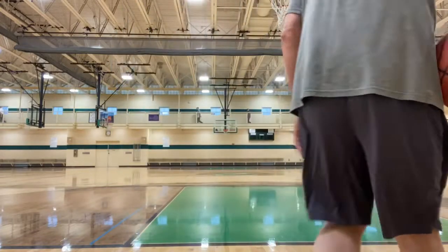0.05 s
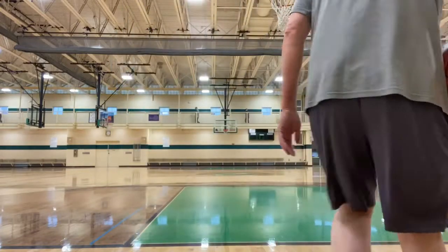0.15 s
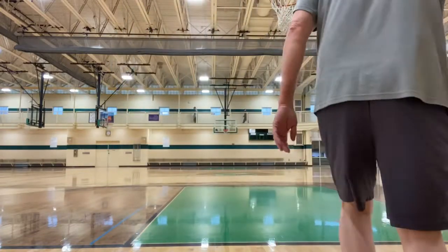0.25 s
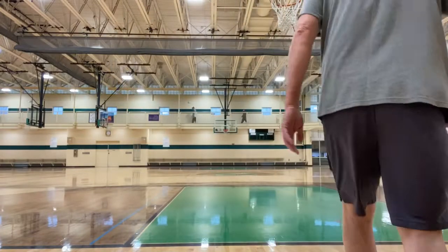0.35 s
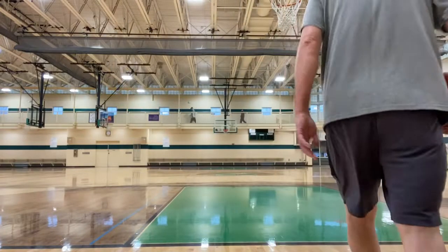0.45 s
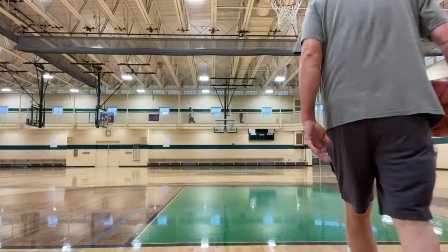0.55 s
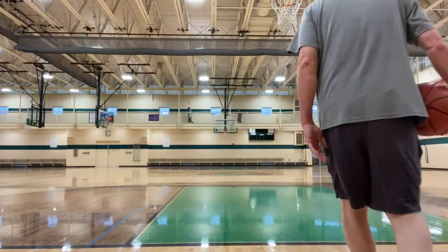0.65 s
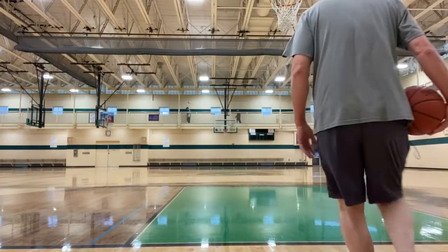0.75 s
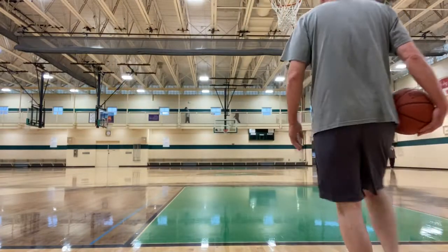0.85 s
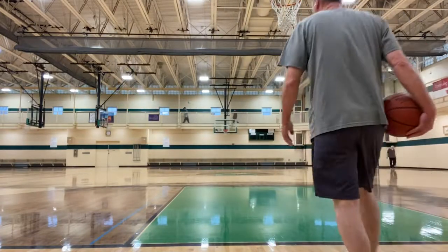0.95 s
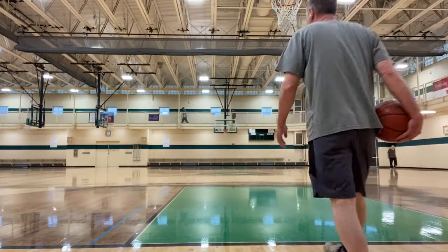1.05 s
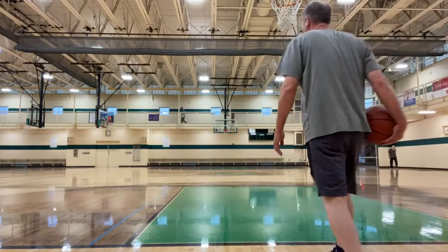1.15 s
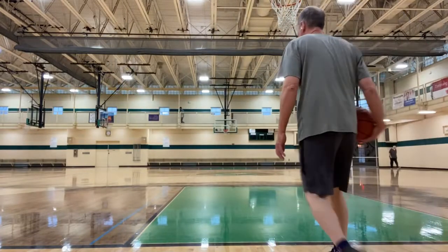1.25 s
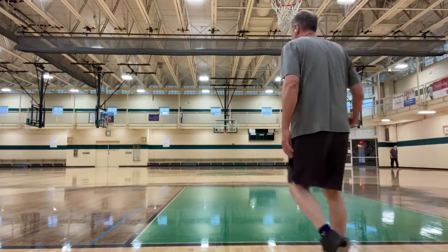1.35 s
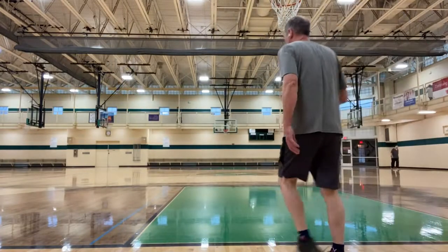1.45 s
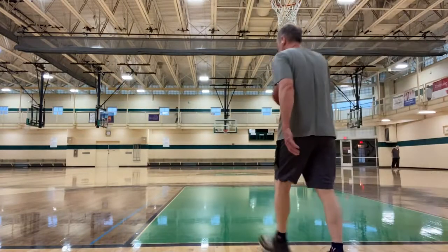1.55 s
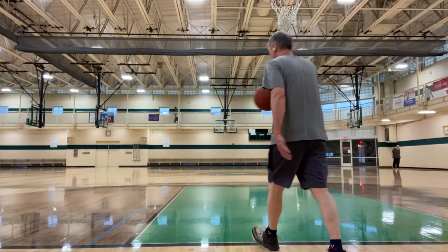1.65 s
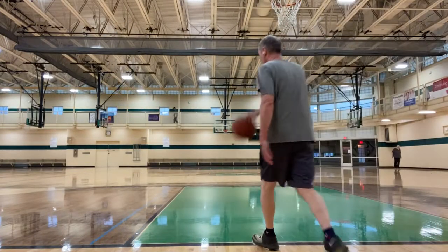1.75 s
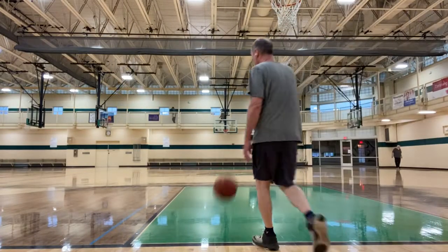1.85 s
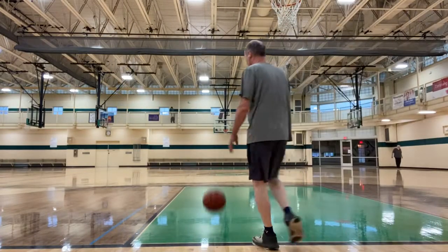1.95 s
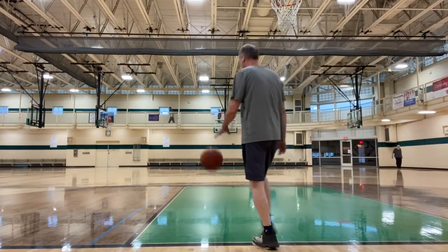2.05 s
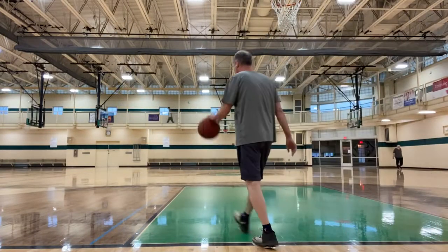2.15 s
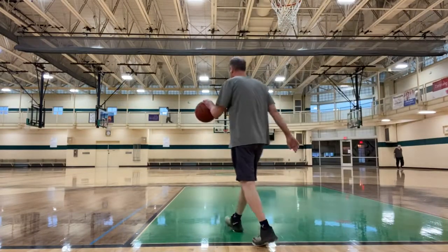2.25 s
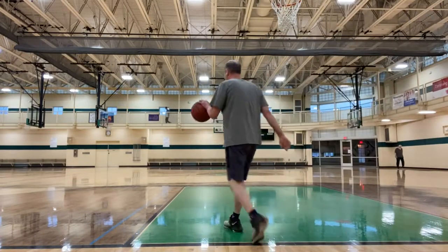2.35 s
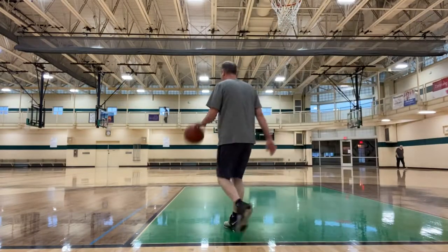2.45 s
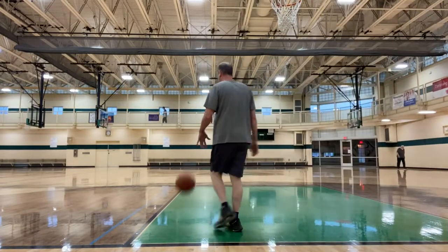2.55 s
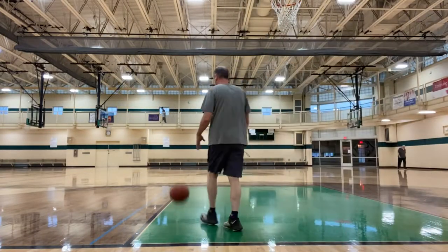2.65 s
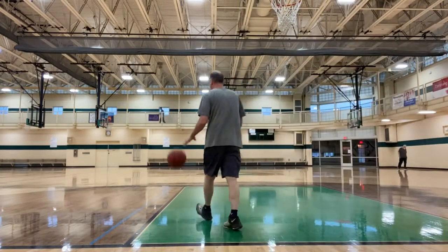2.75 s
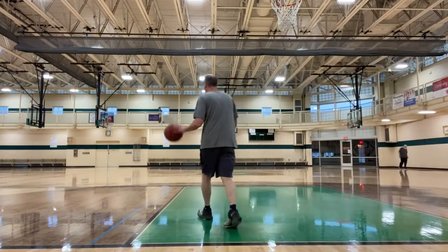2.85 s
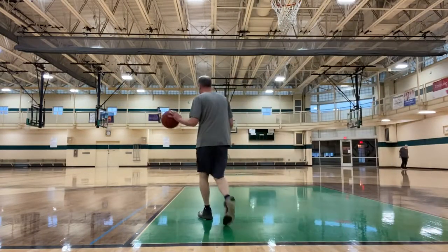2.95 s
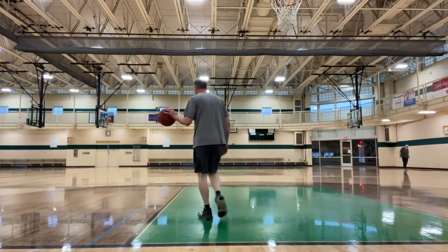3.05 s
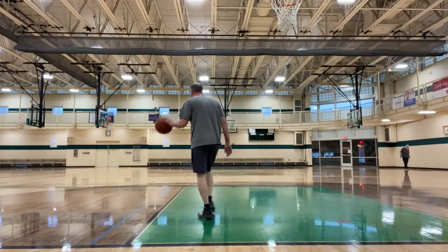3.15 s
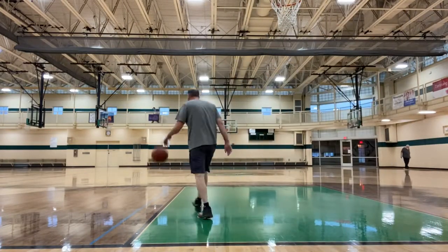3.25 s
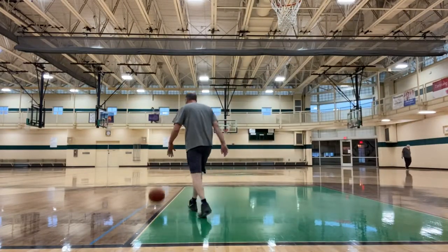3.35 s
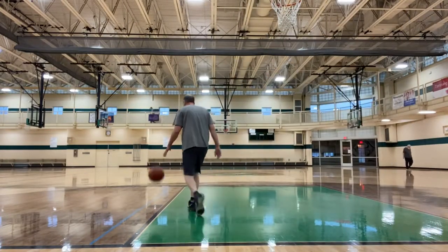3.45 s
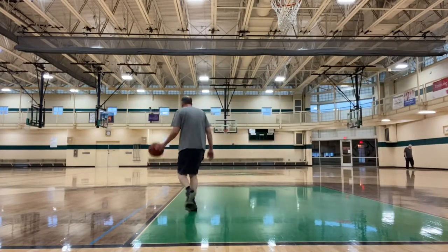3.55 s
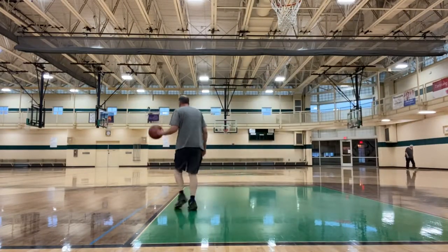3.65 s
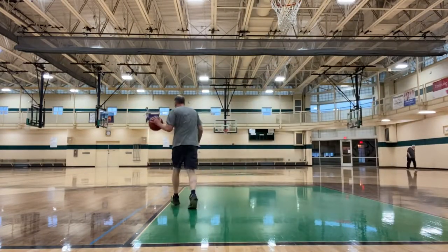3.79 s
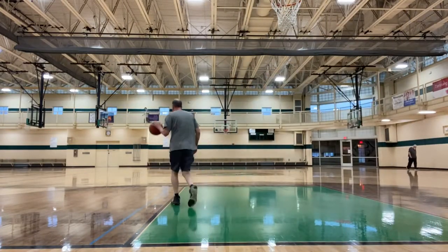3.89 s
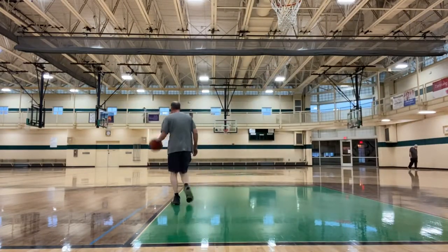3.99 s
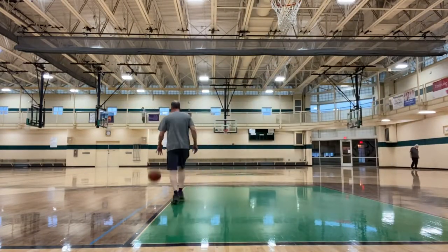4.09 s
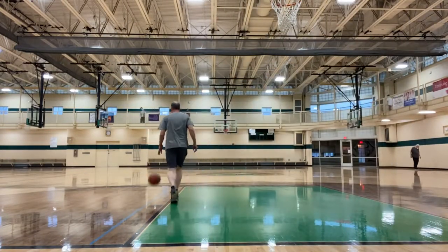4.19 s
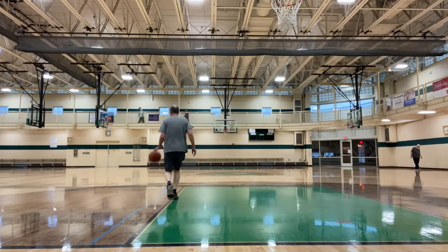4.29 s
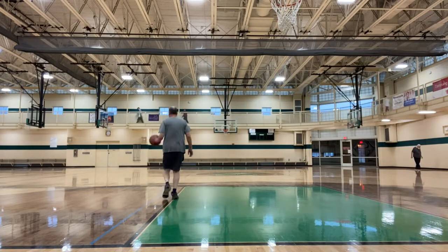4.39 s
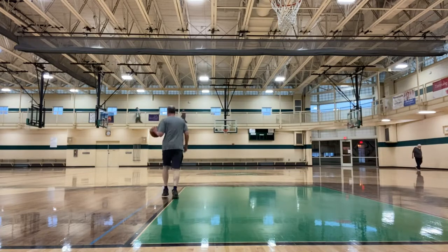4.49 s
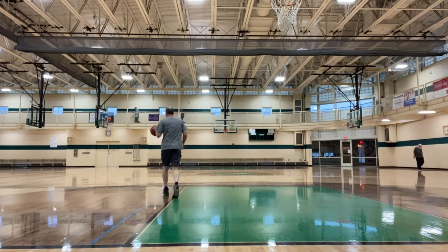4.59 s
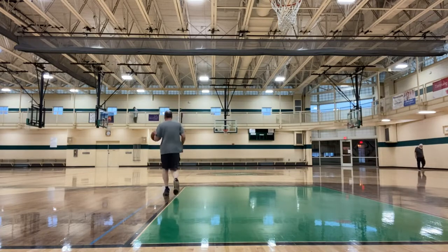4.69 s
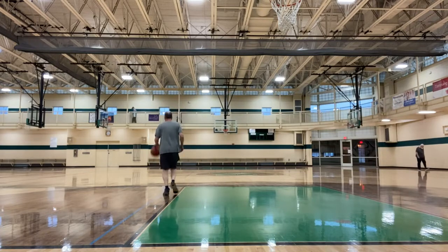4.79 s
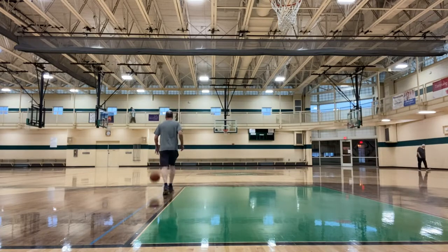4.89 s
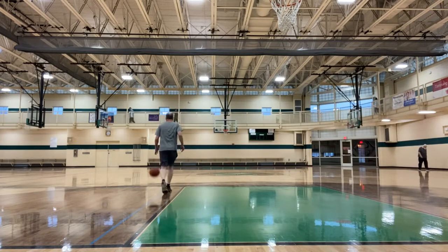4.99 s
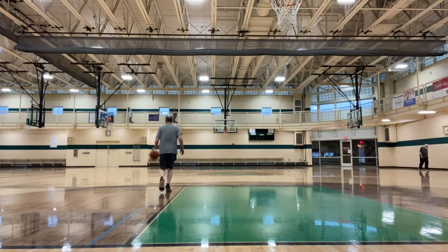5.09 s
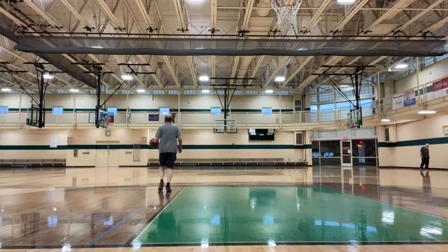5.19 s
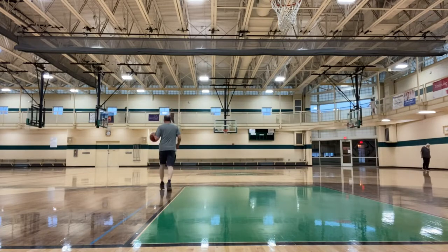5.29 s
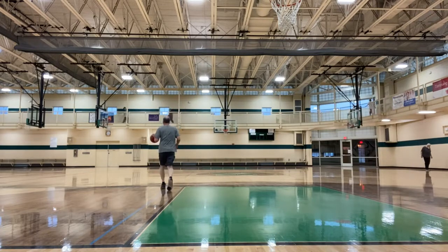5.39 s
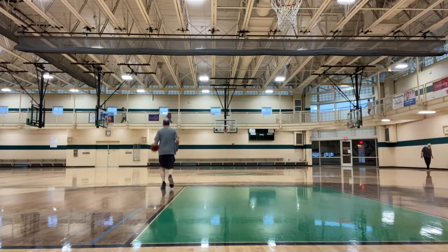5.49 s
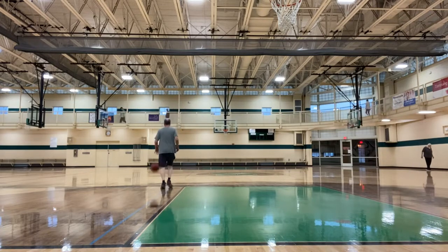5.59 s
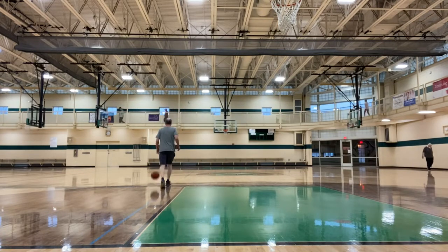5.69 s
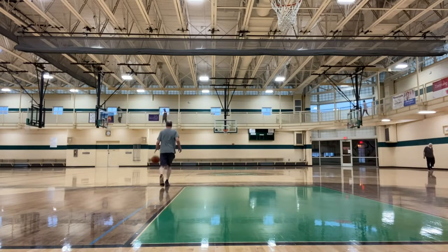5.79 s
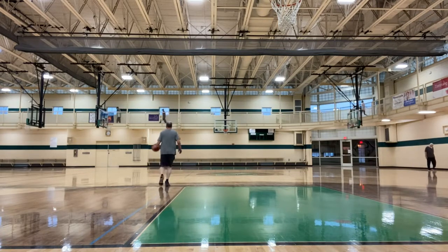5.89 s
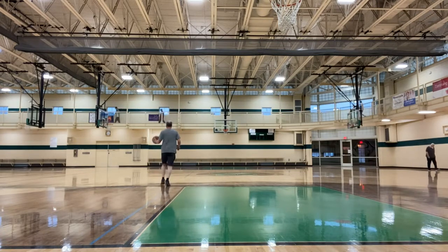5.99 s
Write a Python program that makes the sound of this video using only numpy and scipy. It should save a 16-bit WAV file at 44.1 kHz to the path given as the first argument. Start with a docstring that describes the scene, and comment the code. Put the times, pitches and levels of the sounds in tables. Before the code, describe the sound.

Ventilation hums steadily in a large gym. Close by, shoes thud and click softly on the wooden floor and clothes rustle faintly. After about two seconds a basketball is dribbled six times at a slow, even pace. Each bounce has a sharp slap, a hollow ping and a low boom, followed by echoes and long reverberation. The ball moves gradually away from the fixed stereo microphones.

```python
"""A large gym with a sprung wooden floor, where a basketball is bounced six times, moving away from two
microphones. Each bounce is a slap of the skin, a ping of the air in the ball, a knock of the boards
and a boom of the floor. The hall answers with echoes and a long tail. Behind it the ventilation
blows, clothes rustle, and shoes click and thud. The sound drops out twice."""
import sys
import numpy as np
from scipy import signal
from scipy.fft import rfft, irfft
from scipy.io import wavfile
from scipy.ndimage import uniform_filter1d

SR = 44100
rng = np.random.default_rng(int(sys.argv[2]) if len(sys.argv) > 2 else 0)


def transcribe(u):
    """Save the signal u as a 16-bit wav file named by the first command-line argument.

    u: samples, shape (n,) or (channels, n), limited to [-1, 1]; the rate is SR.
    q: integer samples, one column per channel.
    """
    v = np.clip(np.atleast_2d(u).T, -1, 1)
    q = np.round(v * 32767).astype(np.int16)
    wavfile.write(sys.argv[1], SR, q)


N = 265923

# The bounces, before distance weakens them:
# t/s, boom/dB, boom/Hz, knock/dB, slap/dB, slap colour/Hz, ping/dB, ping colour/Hz
BOUNCES = [(2.0145, -1, 90.5, 0, 11, 6260, -6.5, 1450), (2.7160, -2.5, 103, -5.5, 14.5, 3520, -5, 2180),
           (3.4793, -5, 102, -5, 12, 4750, -4, 2130), (4.2511, -5, 101, -2.5, 8, 3600, -9, 1360),
           (5.0149, -1, 110.3, -4, 16, 5460, -8.5, 2060), (5.7507, -5, 104, -9, 9, 6260, -5, 1470)]
FIRST_DISTANCE_M, WALK_M_PER_S = 8.2, 1.73
SLAP_LEAD_S = 40 / SR  # a slap starts this long before its peak


def gain_of(db):
    """Turns decibels into a gain."""
    return 10 ** (np.asarray(db) / 20)


def unit_rms(x):
    """Scales a signal to an average power of 1."""
    return x / np.sqrt(np.mean(x ** 2) + 1e-20)


def curve_at(points, hz):
    """Joins points with straight lines on a log-frequency axis."""
    f, value = np.transpose(points)
    return np.interp(np.log(hz + 1), np.log(f + 1), value)


def hump_db(hz, centre_hz, height_db, width):
    """A broad lift around one frequency; width in natural-log units."""
    return height_db * np.exp(-((np.log(hz + 1) - np.log(centre_hz)) / width) ** 2)


def add(mix, s, sound, lag_ms=0.):
    """Puts a sound on both microphones at time s, the right one lag_ms later."""
    for channel, start in zip(mix, (s, s + lag_ms / 1000)):
        part = channel[round(start * SR):][:len(sound)]
        part += sound[:len(part)]


def walked_m(s):
    """How far the player has gone since the first bounce."""
    return WALK_M_PER_S * (s - BOUNCES[0][0])


def stereo_noise(colour):
    """Frequencies and two spectra of stereo noise, alike in the bass."""
    # Left-right match: f/Hz, likeness (limited to -1..1 below).
    # Near 13 kHz the sides are in opposite phase, an effect of audio coding.
    likeness = [(60, 1), (130, 0.9), (290, 0.62), (640, -0.13), (1400, 0.11), (3100, -0.037), (6800, -0.49),
                (10000, 1), (12800, -1.6), (15000, .8)]
    hz = np.fft.rfftfreq(N, 1 / SR)
    left, other = rfft(rng.standard_normal((2, N)))
    same = np.clip(curve_at(likeness, hz), -1, 1)
    right = same * left + np.sqrt(1 - same ** 2) * other
    spectra = np.array([left, right]) * gain_of(curve_at(colour, hz))
    return hz, spectra / np.sqrt(np.mean(irfft(spectra, N) ** 2))


def ventilation():
    """Moving air makes a steady noise with a slight slow swell."""
    # Colour of the air noise: f/Hz, relative level/dB
    air_colour = [(20, -42), (30, -26), (43, -9.5), (65, -1), (87, -12), (128, -7.5), (156, -24),
                  (308, -20), (780, -25.5), (1190, -34.5), (2470, -36.5), (5000, -49), (9500, -67),
                  (12700, -74.5), (15000, -81), (16800, -93)]
    t = np.arange(N) / SR
    waves = [np.sin(2 * np.pi * (f * t + rng.random())) / np.sqrt(f) for f in np.geomspace(.2, 5, 20)]
    return gain_of(-30 + 0.46 * unit_rms(sum(waves))) * irfft(stereo_noise(air_colour)[1], N)


def player():
    """Cloth and soles brush with a grainy rustle, shoes click and heels thud."""
    # Brushing strokes: middle t/s, level/dB, length/s
    rustles = [(0.092, -68, .06), (0.426, -67, 0.043), (1.03, -63, 0.18), (1.22, -63, 0.15),
               (1.58, -68, .05), (1.785, -67, .09), (1.88, -63, 0.091), (2.41, -67, 0.067),
               (3.88, -62, 0.1), (4.513, -62, 0.054)]
    # Colour of the rustle: f/Hz, relative level/dB
    rustle_colour = [(2000, -15), (5000, 0), (9000, 5), (11500, -4), (13000, -10), (15000, -8),
                     (16500, -31)]
    # Shoe clicks: t/s, level/dB
    clicks = [(.412, -36), (.53, -48), (1.226, -38), (1.555, -42), (1.59, -44), (3.86, -46), (4.5, -53)]
    # Heels on the boards: t/s, level/dB, f/Hz
    heels = [(0.049, -26, 54.7), (0.419, -24.5, 56.5), (0.769, -20, 61.3), (1.127, -26, 56),
             (1.203, -25, 53), (1.561, -39, 62), (1.871, -40, 63.5)]
    t = np.arange(N) / SR
    faint = [(when * N / SR, -73 + 5 * size, 0.077) for when, size in rng.random((15, 2))]
    strokes = sum(gain_of(db) * np.exp(-(2 * (t - s) / length) ** 2) for s, db, length in rustles + faint)
    grain = unit_rms(uniform_filter1d(rng.standard_normal(N), size=150))
    out = strokes * gain_of(1.9 * grain) * irfft(stereo_noise(rustle_colour)[1], N)
    for s, db in clicks:
        add(out, s, gain_of(db) * slap(0.69, colour_hz=10000))
    for s, db, hz in heels:
        add(out, s, gain_of(db) * low_note(hz, rise_s=0.0292, t60=0.14))
    return out


def hall_tail():
    """Each bounce fills the hall with noise that flutters and dies away, each band at its own speed."""
    # Tail as heard, with a narrow gap near 13 kHz from audio coding: f/Hz, relative level/dB
    heard_colour = [(20, -47), (32, -20), (65, -2.5), (132, -3.5), (270, -15), (400, -21), (550, -26),
                    (940, -36.5), (1720, -33), (4600, -43), (9600, -54), (11300, -56.5), (12800, -70),
                    (14300, -61), (16800, -84)]
    # How long the hall rings: f/Hz, time to fade by 60 dB/s
    fade_times = [(50, 1.95), (100, 5.14), (200, 2.39), (400, 2.58), (1000, 3.3), (2500, 1.54),
                  (5000, 1.99), (9000, 0.91), (15000, 0.98)]
    hz, spectra = stereo_noise(heard_colour)
    centres = np.geomspace(45, 16000, num=14)
    band_position = np.interp(np.log(hz + 1), np.log(centres), np.arange(len(centres)))
    flutter = unit_rms(uniform_filter1d(uniform_filter1d(rng.standard_normal(N), size=500), size=300))
    out = np.zeros((2, N))
    for k, centre in enumerate(centres):
        power = np.zeros(N)
        above_bass = centre / (centre + 77)
        for s, boom_db, _, _, slap_db, slap_hz, *_ in BOUNCES:
            tilt = [(150, boom_db - 15.5), (1200, -19.5), (6000, slap_db - 31)]  # f/Hz, level/dB
            level_db = curve_at(tilt, centre) + hump_db(centre, slap_hz, 6.6, 0.42)
            age = np.arange(N - round(s * SR)) / SR
            fading = gain_of(2 * (level_db - 60 * age / curve_at(fade_times, centre)))
            fill_s = 0.00067 * 2 ** (walked_m(s) / 1.47) + 0.82 / centre  # slower from further away
            filled = (1 - np.exp(-age / fill_s)) ** 2
            # Nearby walls and the roof answer first, after a short gap.
            early_db = 16 - 1.83 * walked_m(s)
            after_gap = 1 / (1 + (0.0066 / (age + 1e-4)) ** 6)
            early = above_bass * gain_of(2 * early_db) * np.exp(-age / 0.016) * after_gap
            power[round(s * SR):] += filled * (1 + early) * fading
        band = irfft(spectra * np.clip(1 - abs(band_position - k), 0, 1), N)
        out += band * np.sqrt(power) * gain_of(1.22 * above_bass * flutter)
    return out


def ringing():
    """The ball keeps ringing on its way up, and the hall smears that note into a band of noise."""
    out, age, hz = np.zeros((2, N)), np.arange(SR) / SR, np.fft.rfftfreq(SR, 1 / SR)
    envelope = gain_of(-37 - 60 * age / 1.74) * (1 - np.exp(-age / 0.044))
    for s, *_, ping_hz in BOUNCES:
        band = 1 / (1 + ((hz - ping_hz) / (.2 * ping_hz)) ** 2)
        note = unit_rms(irfft(rfft(rng.standard_normal((2, SR))) * band)) * envelope
        part = out[:, round(s * SR):][:, :SR]
        part += note[:, :part.shape[1]]
    return out


def echoes():
    """The walls send back single slaps and pings, and the bass of the tail swells up again."""
    # Later echoes: t/s, slap/dB, ping/dB
    late_echoes = [(2.38, -60, -36), (2.762, -8, -45), (2.875, -50, -32), (3.635, -47, -31.5),
                   (3.815, -60, -34), (4.375, -19, -28), (5.079, -0.5, -50), (5.2, -60, -36),
                   (5.813, -11.5, -41), (5.875, -58, -30)]
    # Bass swells: t/s, level/dB, f/Hz
    swells = [(2.059, -15.5, 106), (2.271, -10, 77), (2.379, -13, 69), (2.751, -10.5, 104.5),
              (2.909, -19, 80.3), (3.05, -20, 72.7), (3.507, -15, 72.4), (3.635, -21.5, 80),
              (3.76, -20, 73.5), (5.051, -13, 105.6), (5.199, -16.5, 104.5), (5.3, -18, 78),
              (5.792, -21, 94.6), (5.875, -18.5, 88.6)]
    out = np.zeros((2, N))

    def wall_pings(s, ping_db, ping_hz):
        """Uneven walls spread one ping into three."""
        for late_s in (0, .006, .013):
            add(out, s + late_s, gain_of(ping_db) * ping(ping_hz), lag_ms=.05)

    for s, *_, ping_db, ping_hz in BOUNCES:
        wall_pings(s + .042, ping_db - 23.5, ping_hz)  # a near wall returns every bounce
    for s, slap_db, ping_db in late_echoes:
        add(out, s - SLAP_LEAD_S, gain_of(slap_db) * slap(0.95), lag_ms=.05)
        last_ping_hz = [row[-1] for row in BOUNCES if row[0] < s][-1]
        wall_pings(s, ping_db, last_ping_hz)
    for s, db, hz in swells:
        add(out, s, gain_of(db) * low_note(hz, rise_s=0.0211, t60=0.36))
    return out


def low_note(hz, rise_s, t60):
    """A low vibration builds up while it is pushed, then fades by 60 dB in t60 seconds."""
    t = np.arange(SR // 4) / SR
    rise = np.sin(np.pi / 2 * t / rise_s) ** 2
    fall = gain_of(-60 * (t - rise_s) / t60)
    return np.where(t < rise_s, rise, fall) * np.cos(2 * np.pi * hz * (t - rise_s))


def ping(colour_hz):
    """The air in the ball rings at several notes; those near colour_hz are struck harder."""
    # Notes of the air, damped by the floor: f/Hz, relative level/dB, time to fade by 60 dB/s
    air_notes = [(1147, 6.5, 0.042), (1442, 12.5, 0.023), (1706, 7, 0.037), (2160, 8, 0.017),
                 (2520, 1, .025), (3300, -53, .02), (3950, -8, .02)]
    t = np.arange(4000) / SR
    ring = np.zeros(len(t))
    for hz, db, t60 in air_notes:
        strength, detune = rng.standard_normal(2)
        start_db = db + hump_db(hz, colour_hz, 8.6, 0.37) + 3.6 * strength
        ring += gain_of(start_db - 60 * t / t60) * np.sin(2 * np.pi * hz * (1 + 0.061 * detune) * t)
    return ring / np.linalg.norm(ring) * 5


def slap(fade_ms, colour_hz=9000.):
    """A sharp snap with a tiny noisy wake; colour_hz stands for how the skin lands."""
    # Colour of the snap: f/Hz, relative level/dB
    snap_colour = [(1500, -32.5), (3000, -11.5), (5700, 1), (7200, -5), (9000, -8.5), (11000, -13.5),
                   (13000, -21), (15500, -19), (17000, -32)]
    hz, t = np.fft.rfftfreq(512, 1 / SR), np.arange(512) / SR
    wake = rng.standard_normal(512) * np.exp(-t * 1000 / fade_ms)
    burst = np.roll((t == 0) + 0.5 * wake * (t > 0), round(SLAP_LEAD_S * SR))
    colour_db = curve_at(snap_colour, hz) + hump_db(hz, colour_hz, 9.9, 0.24)
    snap = irfft(rfft(burst) * gain_of(colour_db))
    return snap / np.linalg.norm(snap) / 2


def right_microphone(direct):
    """Sound straight from the ball reaches the right side with a shifted phase and treble."""
    # How far the left side leads: f/Hz, phase/radians
    left_leads = [(0, 0), (2500, 1.4), (4500, 2.7), (5700, 3.5), (7200, 2.4), (9000, .9), (13000, -3.1),
                  (17000, -8)]
    # Right side against left: f/Hz, level/dB
    right_shade = [(2500, 2), (3500, -2), (7200, -1.5), (9000, 1.5)]
    hz = np.fft.rfftfreq(N, 1 / SR)
    phase = np.interp(hz, *np.transpose(left_leads))
    shade = gain_of(curve_at(right_shade, hz) * (hz > 1800))
    return irfft(rfft(direct) * shade * np.exp(-1j * phase), N)


def ball():
    """Each landing slaps the skin, rings the air inside and shakes the floor, weaker with distance."""
    contact_s = .0105  # time spent on the boards
    out = np.zeros((2, N))
    for s, boom_db, boom_hz, knock_db, slap_db, slap_hz, ping_db, ping_hz in BOUNCES:
        near = FIRST_DISTANCE_M / (FIRST_DISTANCE_M + walked_m(s))
        boom, knock, snap, ring = near * gain_of([boom_db, knock_db, slap_db, ping_db])
        slap_s = s - SLAP_LEAD_S
        add(out, slap_s, snap * slap(0.33, slap_hz))
        add(out, slap_s + .0029, snap * gain_of(-6.5) * slap(0.17, slap_hz))  # across the ball and back
        add(out, s, ring * ping(ping_hz))
        # The ball sounds again as it leaves.
        add(out, s + contact_s, near * gain_of(-11.5) * ping(1060))
        add(out, slap_s + contact_s, near * snap * gain_of(-19) * slap(0.6, slap_hz))
        # The boards knock at two pitches.
        add(out, s, knock * low_note(315, 0.00897, 0.016))
        add(out, s, knock * gain_of(-18) * low_note(1.91 * 315, 0.00404, 0.069))
        # The beams below take the push, and the floor booms; its deeper note is slower.
        add(out, s, boom * gain_of(-20) * low_note(210, 0.0097, 0.011))
        add(out, s, boom * low_note(boom_hz, 0.0177, 0.11))
        add(out, s, boom * gain_of(-8.5) * low_note(0.653 * boom_hz, 0.0297, 0.18))
    return np.array([out[0], right_microphone(out[1])])


def scene():
    """Everything at the two microphones."""
    return ventilation() + player() + hall_tail() + ringing() + echoes() + ball()


def record(dry):
    """Left is louder, peaks are rounded, the sound drops out twice and the highest treble is cut."""
    # Silences: start t/s, end t/s
    dropouts = [(1.1275, 1.1487), (1.1715, 1.1975)]
    left_db, ceiling, cutoff_hz = 1.83, 1.02, 16500
    out = dry * gain_of([[left_db / 2], [-left_db / 2]])
    out = ceiling * np.tanh(out / ceiling)
    t = np.arange(N) / SR
    for start, end in dropouts:
        out = out * ((t < start) | (t >= end))
    lowpass = signal.firwin(511, cutoff_hz, window=("kaiser", 9), fs=SR)
    return signal.oaconvolve(out, lowpass[None], "same")


dry = scene()
out = record(dry)
transcribe(out)
```